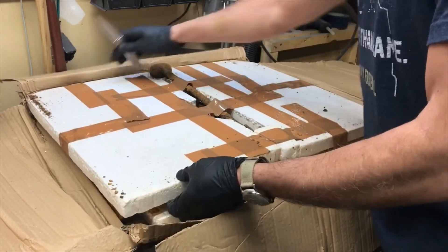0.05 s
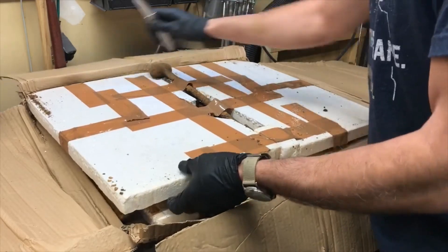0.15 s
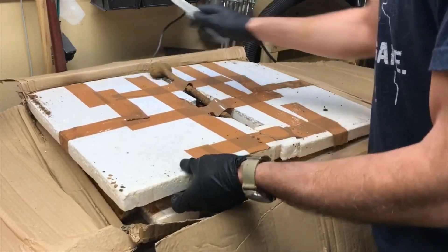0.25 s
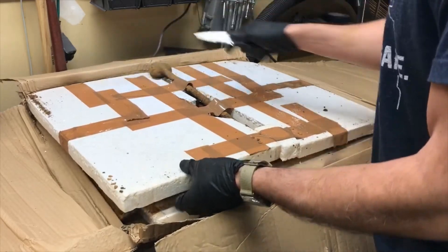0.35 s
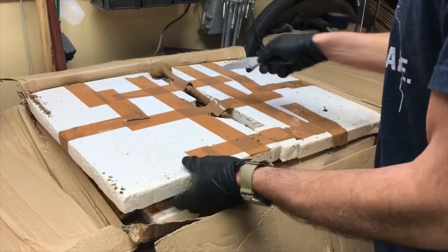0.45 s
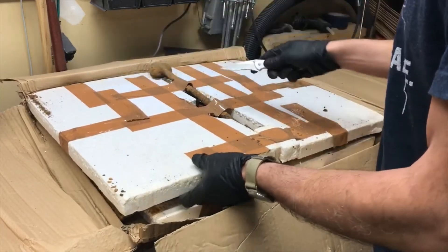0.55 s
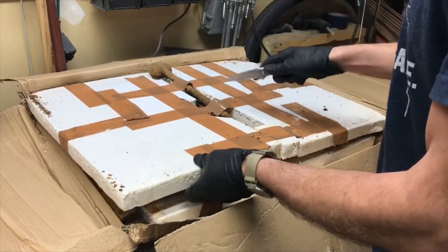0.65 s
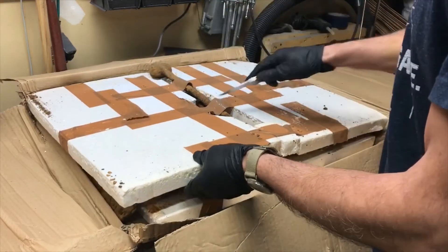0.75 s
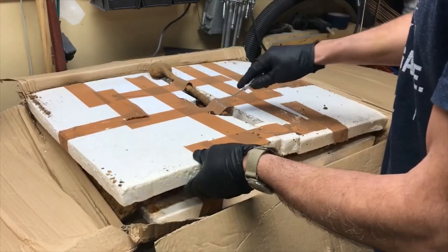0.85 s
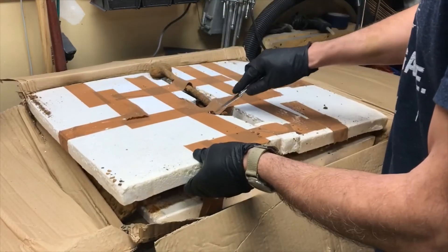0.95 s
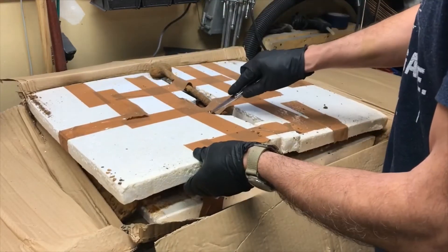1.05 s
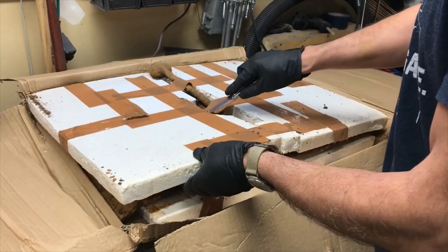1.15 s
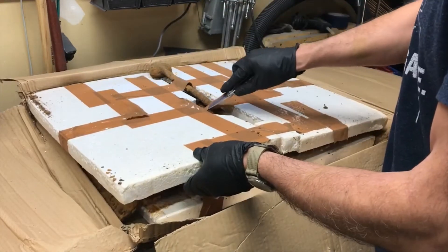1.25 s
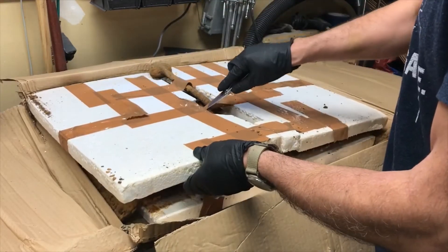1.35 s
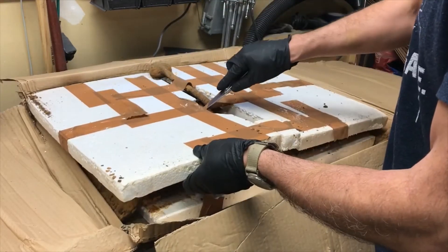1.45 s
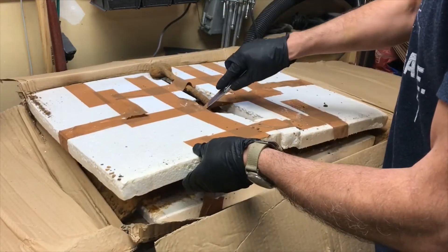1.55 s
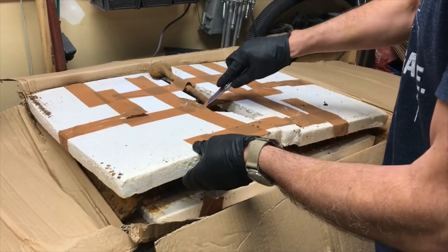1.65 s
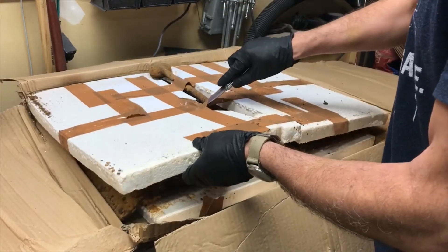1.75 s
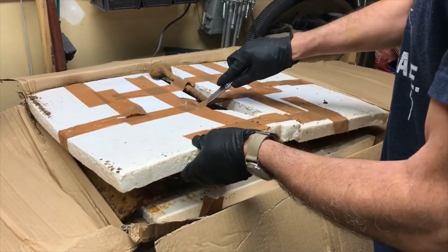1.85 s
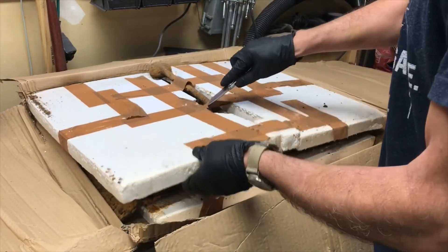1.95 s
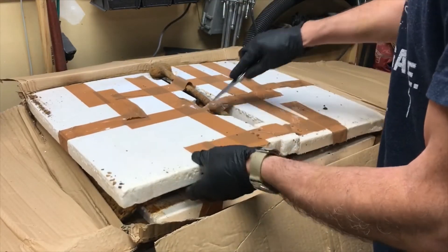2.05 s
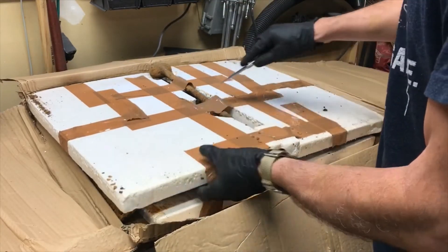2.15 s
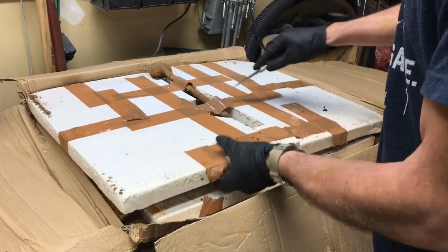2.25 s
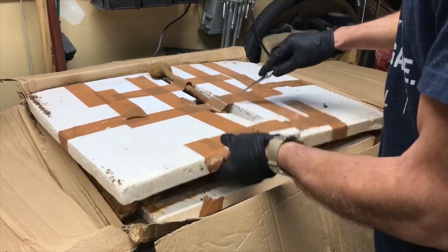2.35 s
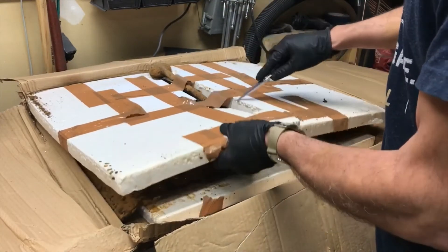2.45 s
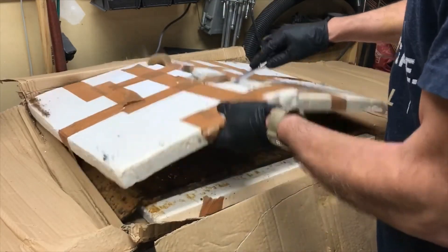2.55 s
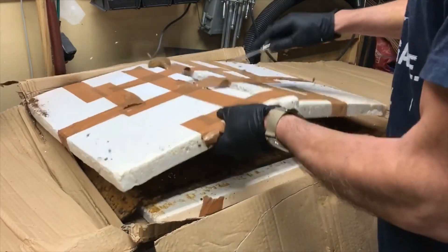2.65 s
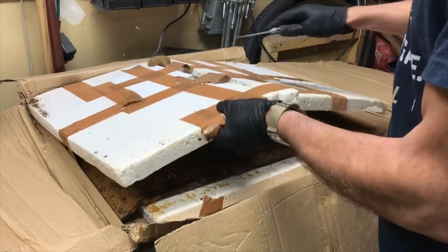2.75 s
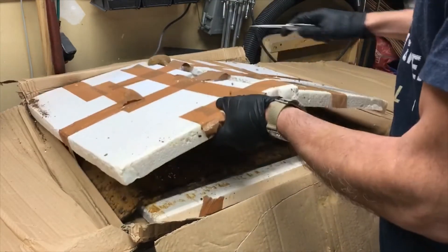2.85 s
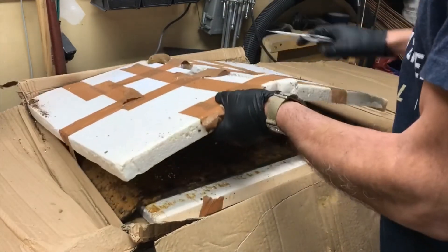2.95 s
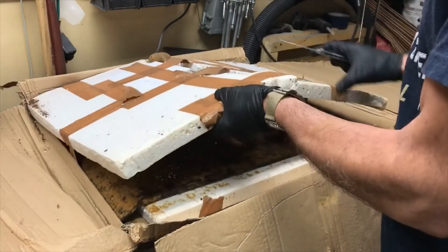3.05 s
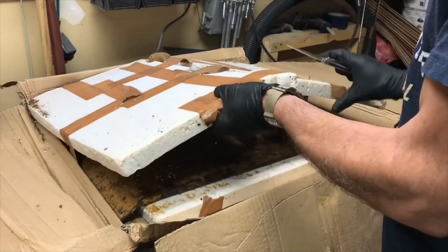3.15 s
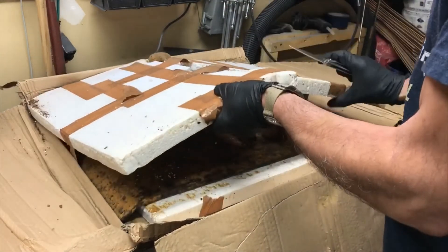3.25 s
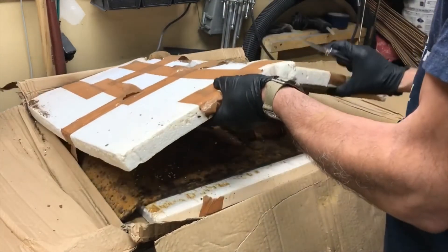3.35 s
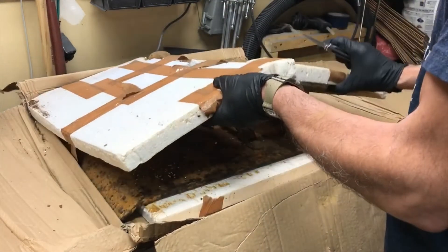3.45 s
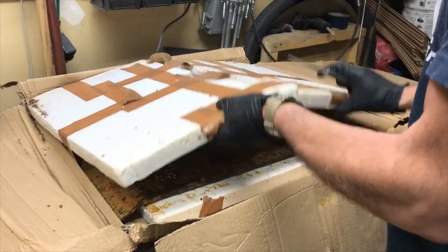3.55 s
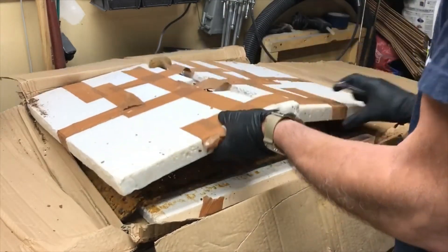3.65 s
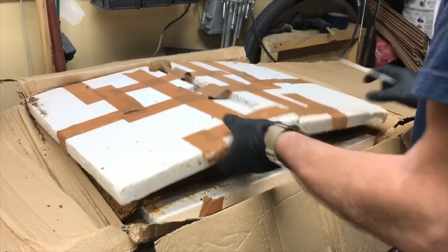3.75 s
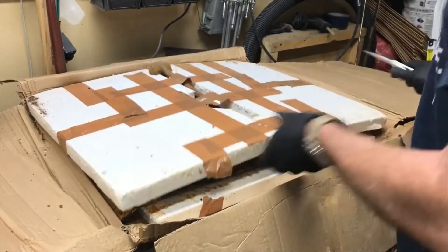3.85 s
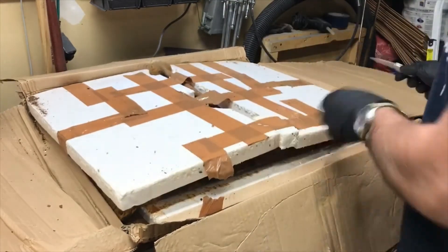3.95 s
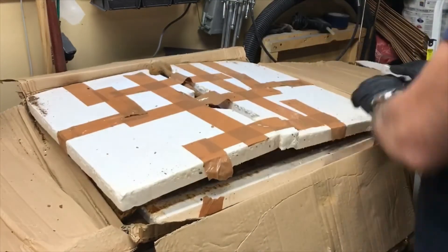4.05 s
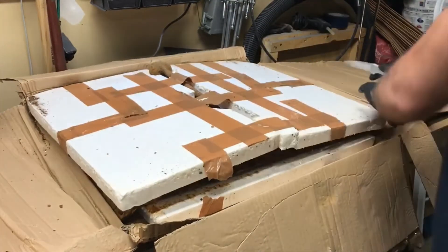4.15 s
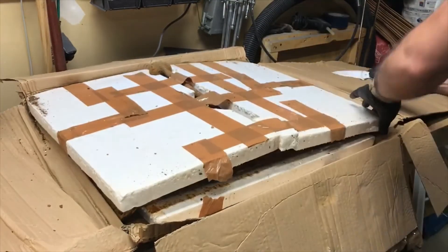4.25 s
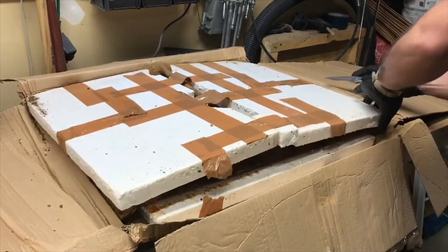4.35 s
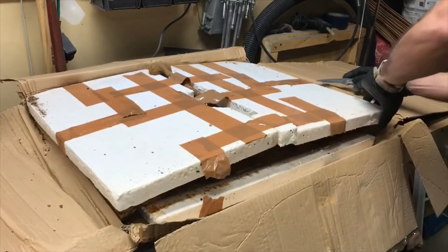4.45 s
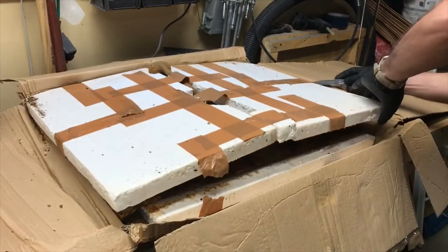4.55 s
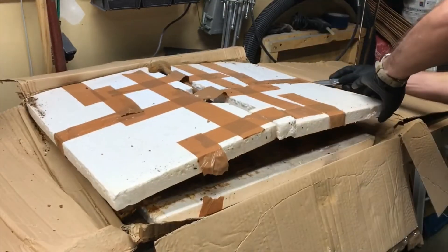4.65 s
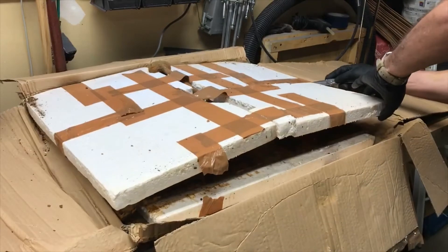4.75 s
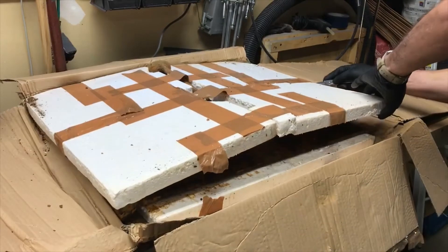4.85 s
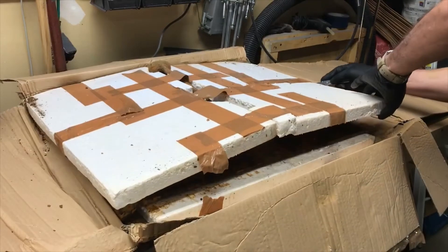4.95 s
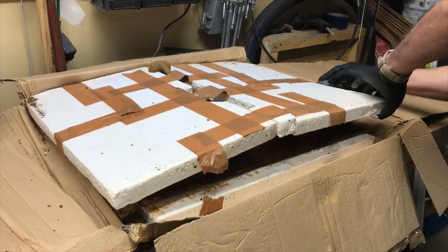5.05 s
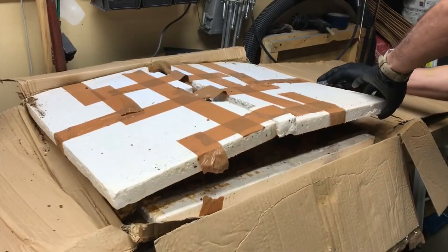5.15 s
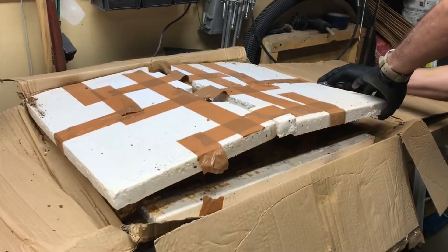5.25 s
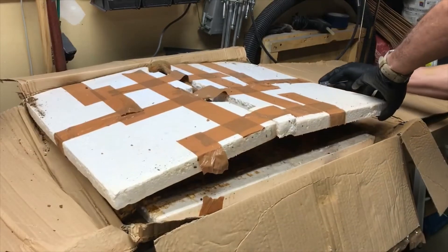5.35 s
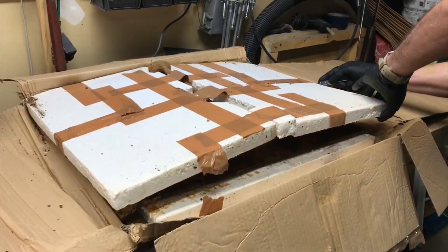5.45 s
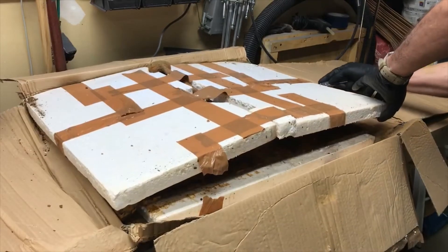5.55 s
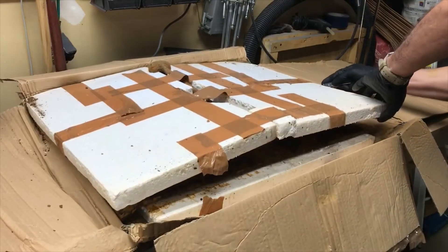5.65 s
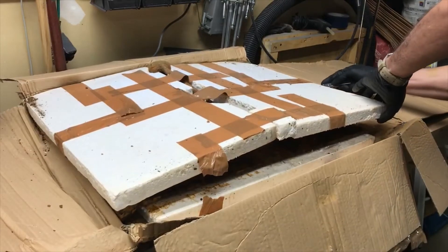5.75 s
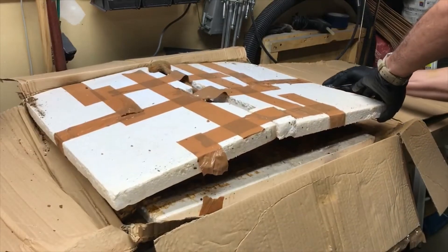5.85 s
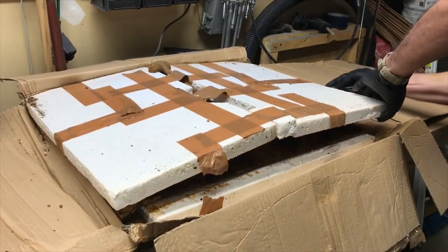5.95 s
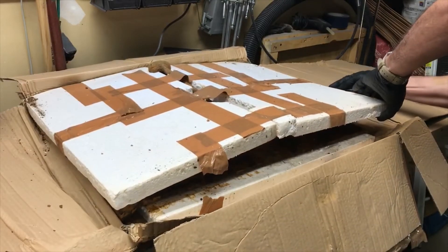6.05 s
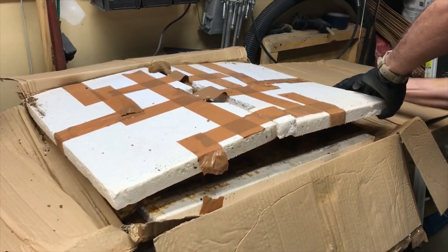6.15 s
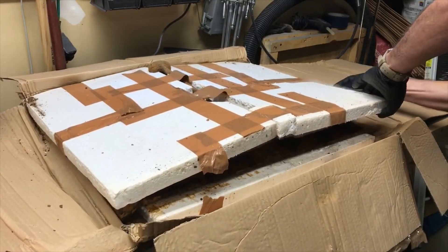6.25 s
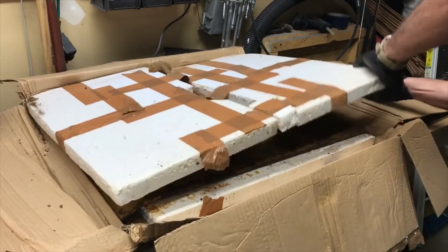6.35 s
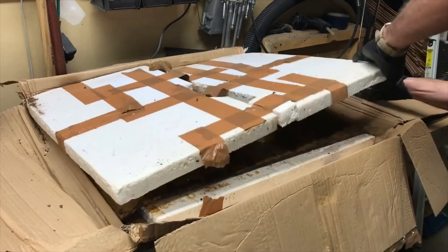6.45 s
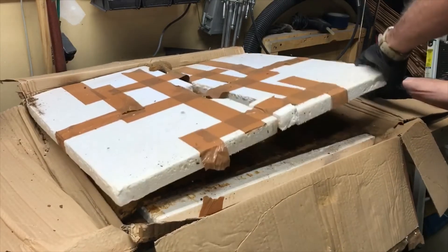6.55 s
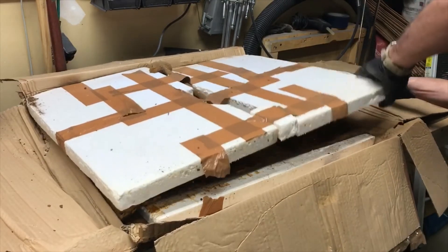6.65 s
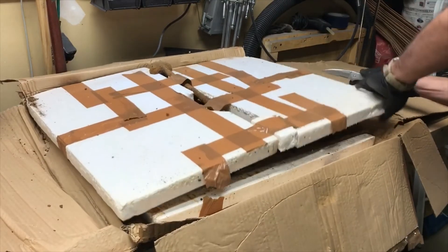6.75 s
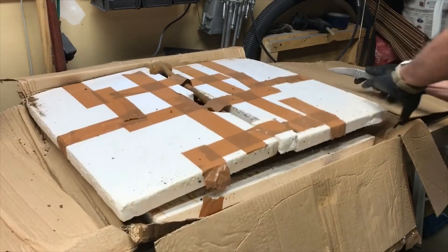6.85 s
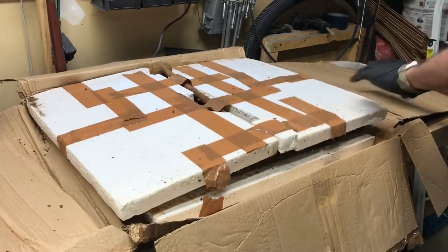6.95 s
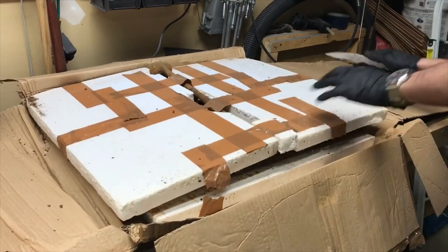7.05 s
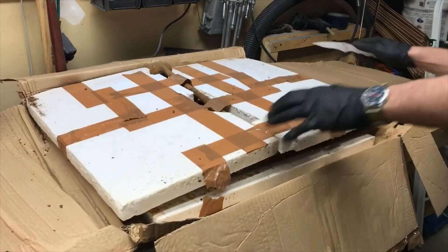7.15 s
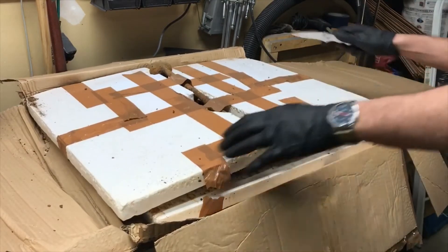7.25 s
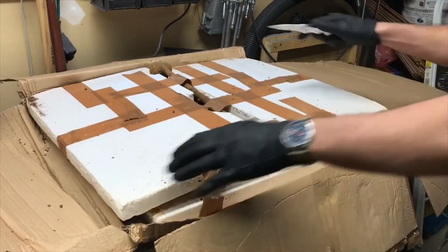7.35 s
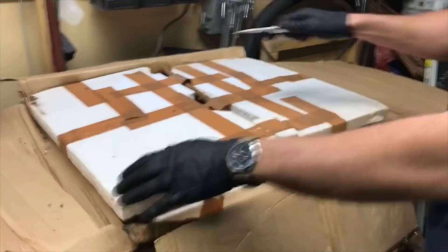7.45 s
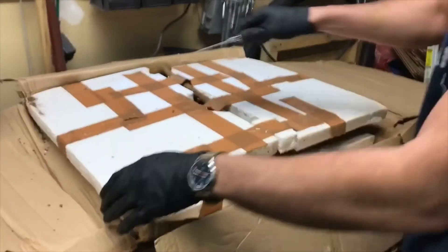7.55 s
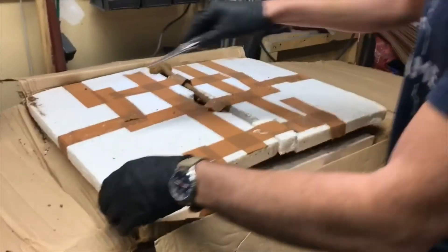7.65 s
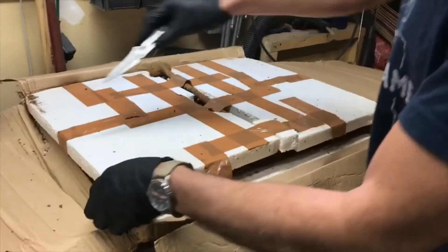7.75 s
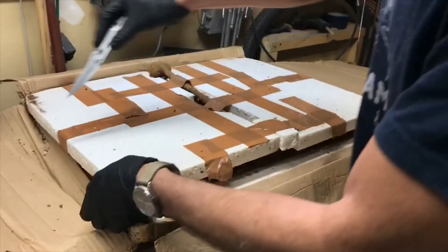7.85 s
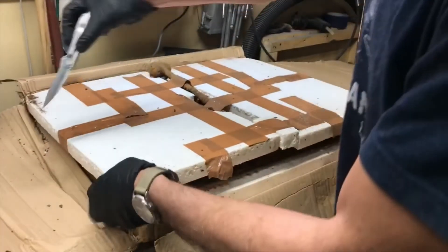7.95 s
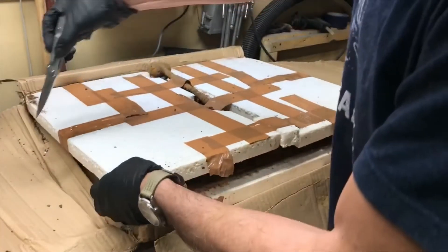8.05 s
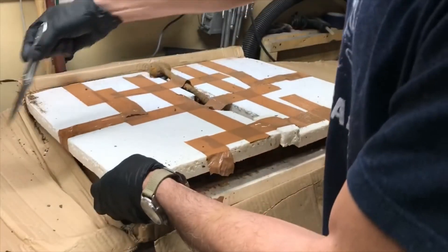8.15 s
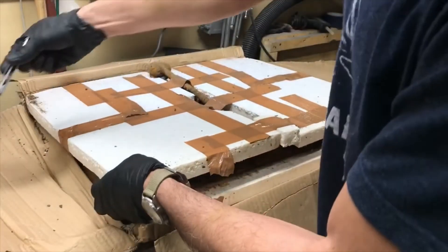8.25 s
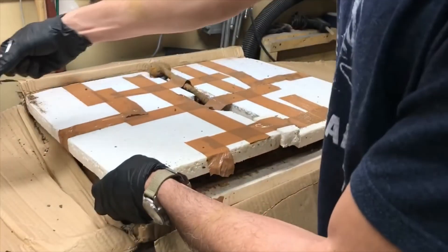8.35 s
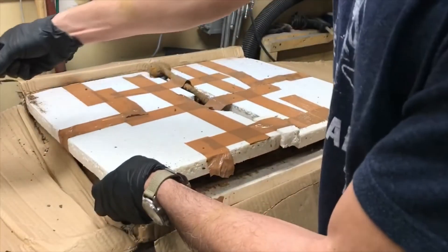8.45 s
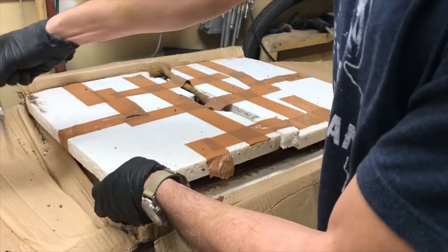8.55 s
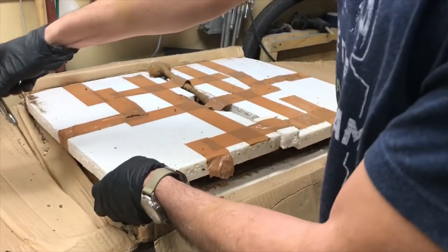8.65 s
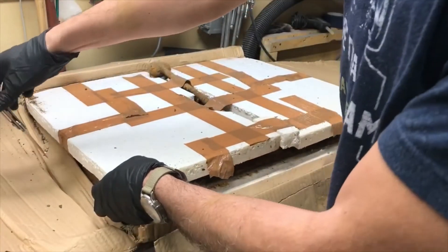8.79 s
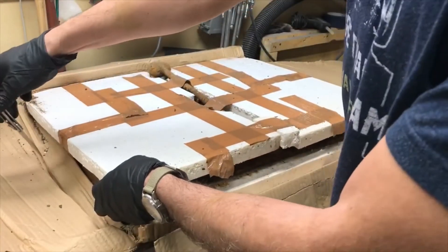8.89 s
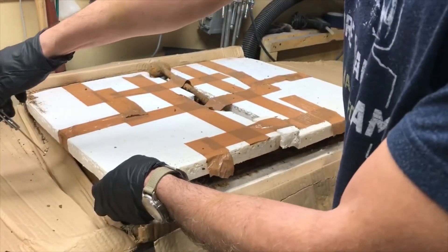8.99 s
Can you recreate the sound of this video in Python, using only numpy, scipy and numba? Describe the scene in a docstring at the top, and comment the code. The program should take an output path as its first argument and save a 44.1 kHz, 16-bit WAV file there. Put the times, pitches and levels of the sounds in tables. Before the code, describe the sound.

Tape crinkles and stiff foam creaks as gloved hands pry a slab from a cardboard box, with sharp cracks and dull thumps.

```python
"""A soft bump and a rush of rubbing and crinkling come first, over a low hum in a small workshop.
Gloved hands cut tape and prise a stiff foam slab out of a cardboard box, a metre from a phone.
Foam creaks and tape crinkles as many tiny rings; glued spots let go with cracks that ring the slab.
Bumps are bursts of low noise that ring the box, and brushes are narrow hisses.
The room adds a short tail of fading noise."""
import sys
import numpy as np
from scipy import signal
from scipy.fft import rfft, irfft
from scipy.io import wavfile
from scipy.ndimage import uniform_filter1d
from numba import njit

SR = 44100
rng = np.random.default_rng(int(sys.argv[2]) if len(sys.argv) > 2 else 0)


def attenuation_scalar(level_db):
    """Turn a level in dB into a linear amplitude multiplier (20 dB per decade)."""
    decades = np.asarray(level_db, float) / 20
    return 10 ** decades


def to_wav(s):
    """Save 16-bit WAV."""
    ch = np.atleast_2d(s).T  # columns
    pcm = np.round(np.clip(ch, -1, 1) * 32767)  # PCM
    wavfile.write(sys.argv[1], SR, pcm.astype(np.int16))


N = 397782  # length in samples, about 9 s


def level(x, db):
    """Scale a sound to an rms level in dB."""
    return x * attenuation_scalar(db) / np.sqrt(np.mean(x ** 2))


def colour(x, points):
    """Filter through (f/Hz, level/dB) points without any sound ahead of time, from the folded cepstrum."""
    hz, db = np.transpose(points)
    size = 4096
    log_hz = np.log(np.fft.rfftfreq(size, 1 / SR) + 1)
    gain = np.interp(log_hz, np.log(hz), db) * np.log(10) / 20
    cepstrum = irfft(gain)
    cepstrum[1:size // 2] *= 2
    cepstrum[size // 2 + 1:] = 0
    response = irfft(np.exp(rfft(cepstrum)))
    return signal.fftconvolve(x, response)[:len(x)]


@njit
def rings(start, hz, cycles, size):
    """Fading rings, each dying by 1/e in its number of cycles."""
    out = np.zeros(N)
    for k in range(len(start)):
        turn = np.exp((2j * np.pi - 1 / cycles[k]) * hz[k] / SR)
        z = size[k] + 0j
        end = min(N, start[k] + int(6 * cycles[k] * SR / hz[k]))
        for i in range(start[k], end):
            z *= turn
            out[i] += z.imag
    return out


def modes(x, table):
    """A solid body answers with fading tones, listed as (f/Hz, level/dB, t60/s)."""
    t = np.arange(SR // 2) / SR
    ring = sum(attenuation_scalar(db) * np.sin(2 * np.pi * hz * t) * 1000. ** (-t / t60) for hz, db, t60 in table)
    return signal.fftconvolve(x, ring / np.abs(ring).max())[:N]


def walk(rate):
    """Random levels held 1 / rate seconds, with sloping steps; spread near 1."""
    k = int(SR / rate)
    held = np.repeat(rng.standard_normal(N // k + 1), k)
    return uniform_filter1d(held, k // 2)[:N]


def grains(count, low_hz, high_hz, cycles, spread_db, most_db):
    """Tiny slips at random moments, mostly small, a few larger, each with its own pitch."""
    u = rng.random((count, 4))
    hz = low_hz * (high_hz / low_hz) ** u[:, 1]
    size_db = np.minimum(-spread_db * np.log(1 - u[:, 2]), most_db)
    size = attenuation_scalar(size_db) * np.sign(u[:, 3] - .5) * hz / low_hz
    return rings((u[:, 0] * N).astype(np.int64), hz, np.full(count, cycles), size)


def rustle(db, points, slips, hiss_db, surge_db):
    """Slips over finer, denser ones (white noise), in quick uneven surges."""
    white = level(slips, 0) + attenuation_scalar(hiss_db) * rng.standard_normal(N)
    return level(colour(white, points) * attenuation_scalar(surge_db), 0) * attenuation_scalar(db)


def swells(start, rise, hold, fade, db, rest_db):
    """Level in dB of movements that rise, hold and fade (seconds per 20 dB); their powers add."""
    step = .002  # s, also the shortest fade
    t = np.arange(0, N / SR + step, step)[:, None]
    rising = np.maximum(start - t, 0) / rise
    fading = np.maximum(t - start - np.abs(hold), 0) / np.maximum(fade, step)
    movement_db = db - 20 * np.minimum(rising + fading, 10)
    power = attenuation_scalar(2 * rest_db) + attenuation_scalar(2 * movement_db).sum(axis=1)
    return np.interp(np.arange(N) / SR, t[:, 0], 10 * np.log10(power))


# hands rubbing, dragging and bending the slab:
# (t/s, hold/s, fade/s per 20 dB, foam on card level/dB, tape and glove crinkle level/dB)
# a fade of zero or less is a near-instant stop
STROKES = [(0, 0.002, 0.08, -53, -47), (0.093, 0.048, 0.63, -58, -59), (0.189, 0.062, 0.14, -51, -50),
           (0.375, 0.012, 0.24, -63, -58), (0.475, 0.15, 0.12, -53.5, -50),
           (0.698, 0.055, 0.2, -60.5, -62.5), (0.873, 0, 0.26, -64.5, -61), (1.098, 0.014, 0.1, -62, -59.5),
           (1.211, 0.022, 0, -54, -55), (1.245, 0.051, 0.05, -49.5, -47.5), (1.367, 0.096, 0, -66.5, -62.5),
           (1.492, 0.029, -0.1, -67, -60), (1.542, 0.018, 0.3, -61, -57),
           (1.596, 0.046, 0.11, -46.5, -48.5), (1.733, 0, 0.15, -48.5, -54), (1.76, 0.013, 0.4, -61, -55),
           (1.949, 0.038, 0.64, -52.5, -51), (2.08, 0, 0.14, -49, -48.5), (2.148, 0.1, 0.21, -46, -40),
           (2.336, 0.081, 0.55, -51.5, -52.5), (2.49, 0.11, 1.05, -47, -45.5),
           (2.522, 0.017, 0.07, -26.5, -26), (2.65, 0, 0.15, -41, -42), (2.747, 0.028, 0.27, -42.5, -40),
           (2.917, 0.11, 0.33, -44, -45), (3.174, .025, 0.4, -50, -48), (3.293, 0.1, 0.3, -46, -46.5),
           (3.505, 0.043, -0.15, -49.5, -49), (3.558, 0.057, 0.1, -43, -40.5),
           (3.719, 0.082, 0.07, -49, -47), (3.761, 0.035, 0.22, -41, -41), (3.98, .08, .1, -64, -71),
           (4.143, 0.016, 0, -48, -57), (4.19, 0, .05, -56, -66), (4.243, 0.024, .075, -42.5, -43.5),
           (4.348, 0.22, 0.11, -48.5, -49), (4.67, 0.033, 0.04, -57, -78),
           (4.865, 0.0044, -0.07, -59.5, -77), (5.121, .075, -0.06, -57.5, -63),
           (5.31, 0.043, -0.6, -62, -66), (5.341, 0, 0.2, -52.5, -67), (5.519, 0.0034, 0.28, -56, -52.5),
           (5.591, 0.043, 0, -56, -58), (5.87, 0.042, -0.5, -59.5, -61), (5.927, 0.028, .15, -50, -60),
           (6.075, 0.016, .04, -54, -74.5), (6.328, 0.05, 0.2755, -40, -43.5), (6.5, 0.14, 0.3, -53, -50),
           (6.69, 0.029, 0.23, -47, -49), (6.776, 0.011, 0.1346, -42.5, -41.5),
           (7.087, 0.0058, 0.7, -72, -67), (7.024, 0, 0.18, -63.5, -65), (7.335, 0.0012, 0.15, -62, -77),
           (7.592, 0.035, 0.23, -63.5, -55), (7.664, 0.011, 0.12, -42, -44.5),
           (7.74, 0.033, 0.09, -53, -47.5), (7.854, 0.027, .1, -57, -59), (7.931, 0, 0.0552, -53, -39.5),
           (8, 0.022, 0.07, -47.5, -45.5), (8.1, 0.00066, 0.22, -59.5, -63),
           (8.52, 0.064, -0.3, -71.5, -66), (8.702, .02, -0.15, -75, -65), (8.903, 0.047, .05, -77.5, -66)]


def movement():
    """Rubbing and crinkling levels in dB: the strokes of the hands and the settling after each crack."""
    s, hold, fade, rub_db, crinkle_db = np.transpose(STROKES)
    at, db, _, snap_db = np.transpose(CRACKS)
    rise_s, settle_rise_s = .022, .004  # s per 20 dB
    rest_rub_db, rest_crinkle_db = -76, -73.5  # hands resting on the slab
    # weaker cracks leave a quieter and shorter settling of foam and tape
    settle_rub_db = -25 + 0.86 * db
    settle_crinkle_db = -38.5 + .55 * (db + snap_db)
    settle_fade = 0.12 * attenuation_scalar(0.33 * db)
    start = np.r_[s, at + settle_rise_s]
    rise = np.r_[rise_s + 0 * s, settle_rise_s + 0 * at]
    shape = (start, rise, np.r_[hold, 0 * at], np.r_[fade, settle_fade])
    rub = swells(*shape, np.r_[rub_db, settle_rub_db], rest_rub_db)
    crinkle = swells(*shape, np.r_[crinkle_db, settle_crinkle_db], rest_crinkle_db)
    return rub, crinkle


# tones of the foam slab: (f/Hz, relative level/dB, t60/s)
SLAB_TONES = [(600, -9, 0.077), (854, -5, 0.083), (1120, -13, 0.14), (1120, -1.5, .22), (1160, -6.5, .2),
              (1357, -2.5, 0.15), (1610, -1.5, .1), (1730, -2.5, 0.12), (2200, -8, .08), (2690, -8, .08),
              (3300, -11, .06)]


def slab(x):
    """The stiff slab rings in its own tones when shaken."""
    return modes(x, SLAB_TONES)


# tones of the cardboard box: (f/Hz, relative level/dB, t60/s)
BOX_TONES = [(66, -19.5, .12), (96, -6, 0.15), (128, -6.5, 0.051), (179, -1, 0.11), (220, 2.5, 0.048),
             (274, -1, 0.024), (382, -4, 0.029)]


def box(x):
    """The box walls boom in their own low tones when pushed."""
    return modes(x, BOX_TONES)


# tone balance of foam rubbing on card: (f/Hz, relative level/dB per Hz)
RUB = [(150, -26), (300, -9.5), (450, -7.5), (600, -6), (1100, -4), (1800, -5), (3000, -6.5), (5000, -16.5),
       (9000, -40)]
# tone balance of crinkling tape: (f/Hz, relative level/dB per Hz)
CRINKLE = [(1500, -26), (2800, -12.5), (4400, -2.5), (5000, -6), (6500, -1.5), (7900, -6.5), (8700, -1.5),
           (10500, -7.5), (12000, -3.5), (15000, -7.5)]


def handling():
    """One hand movement makes foam creak in the middle range and tape crinkle in the treble."""
    rub_db, crinkle_db = movement()
    creaks = grains(count=16000, low_hz=495.0, high_hz=4920.0, cycles=1.3, spread_db=2.0, most_db=13)
    ticks = grains(count=25000, low_hz=2500., high_hz=16000.0, cycles=0.97, spread_db=2.5, most_db=16.0)
    surge = walk(70)  # shared by foam and tape
    rub = rustle(rub_db, RUB, creaks, -0.5, 2.5 * surge + 0.96 * walk(60))
    crinkle = rustle(crinkle_db, CRINKLE, ticks, -1.3, 1.6 * surge + 2.5 * walk(60))
    # the contact patch changes, so the creak wanders between dull and bright
    dull = signal.sosfilt(signal.butter(2, 1300., fs=SR, output="sos"), rub)
    lean_db = 2.43 * walk(18)
    rub = dull * attenuation_scalar(-lean_db) + (rub - dull) * attenuation_scalar(lean_db)
    # the rubbing also sets the slab and the box walls ringing
    return rub + attenuation_scalar(-49) * slab(rub) + attenuation_scalar(-30) * box(rub) + crinkle


# slab and box bumping: (t/s, push level/dB before the box rings, hardness of contact as top f/Hz)
THUDS = [(0.0, -40, 298), (1.247, -42.5, 520), (1.64, -48, 520), (2.04, -44.5, 380), (2.52, -23.5, 600),
         (2.54, -23.5, 380), (2.568, -25.5, 298), (2.987, -36.5, 300), (3.352, -34, 380), (3.4, -30.5, 380),
         (3.839, -41.5, 218), (6.116, -34.5, 380), (6.276, -21, 380), (7.387, -31.5, 301),
         (7.408, -31, 200), (7.5, -43.5, 200)]


def thuds():
    """Uneven pushes that swell and die away, duller the softer the contact, ring the box."""
    push = np.zeros(N + SR)
    t = np.arange(SR // 5) / SR
    swell = (1 - np.exp(-t / 0.0096)) * np.exp(-1000 * t / 27.3)  # grows over 9.6 ms, dies over 27.3 ms
    for s, db, hz in THUDS:
        shove = rng.standard_normal(len(t)) * swell
        shove = signal.sosfilt(signal.butter(2, (65., hz), "bandpass", fs=SR, output="sos"), shove)
        size = np.sqrt(np.sum(shove ** 2) * 0.35 * SR / hz)
        first = int(s * SR)
        push[first:first + len(t)] += attenuation_scalar(db) * shove / size
    return box(push[:N])


# tone balance of rumble and hiss: (f/Hz, relative level/dB per Hz)
HUM = [(15, -35), (25, -1.5), (76, 5.5), (130, -2), (344, -9), (451, -12.5), (1070, -14.5), (3250, -24),
       (3620, -43), (5730, -26), (7710, -40), (12200, -35.5), (16000, -37)]


def hum():
    """Workshop rumble and microphone hiss: coloured noise whose level drifts slowly."""
    noise = colour(rng.standard_normal(N), HUM)
    return level(noise * attenuation_scalar(1.0 * walk(4.0)), -63.5)


# the room's fading: (f/Hz, t60/s, level/dB)
ROOM = [(152, 0.56, -11), (505, .42, -1.5), (800, .45, -6), (1130, 0.51, -2.5), (1620, .42, -8),
        (3600, 0.46, -8), (9200, 0.15, -11)]


def room(x):
    """Dense reflections build up over a few ms, then fade at a different pace in each band."""
    t = np.arange(SR) / SR
    hz = [row[0] for row in ROOM]
    noise = rfft(rng.standard_normal(SR))
    # position of each frequency among the table's rows, so that neighbouring bands blend
    place = np.interp(np.log(np.arange(len(noise)) + 1), np.log(hz), np.arange(len(hz)))
    tail = 0
    for k, (_, t60, db) in enumerate(ROOM):
        band = irfft(noise * np.maximum(1 - np.abs(place - k), 0))
        fading = band * 1000. ** (-t / t60)
        tail = tail + attenuation_scalar(db) * fading / np.sqrt(t60 * SR / 2 / np.log(1000))
    build_up = 1 - np.exp(-(t / 0.0039) ** 2)
    return signal.fftconvolve(x, tail * build_up)[:N]


def strays(count):
    """Small cracks at random moments, stronger where the handling around them is stronger."""
    rub_db, crinkle_db = movement()
    u = rng.random((count, 3))
    at = (u[:, 0] * (N - SR // 10)).astype(int)
    db = rub_db[at] + 7 + 9 * u[:, 1] ** 2  # 7 to 16 dB over the rubbing
    return np.c_[at / SR, db, 1000 * 4 ** u[:, 2], crinkle_db[at] - rub_db[at]]


def splinter(s, db, hz, ms, count, fade_db, octaves, cycles):
    """Each break is one sharp slip followed by weaker ones, mostly higher in pitch."""
    u = rng.random((len(s), 3, count))
    later = np.arange(count) > 0
    late = u[:, 0] ** 1.5 * later
    size = attenuation_scalar(db[:, None] - fade_db * late - 2.2 * later) * np.sign(u[:, 1] - .5)
    pitch = hz[:, None] * 2 ** (octaves * (u[:, 2] - .3) * later)
    pitch = np.minimum(pitch, .4 * SR)
    start = ((s[:, None] + late * np.abs(ms[:, None]) / 1000) * SR).astype(np.int64)
    return rings(start.ravel(), pitch.ravel(), np.full(start.size, cycles), size.ravel())


# glue and tape letting go:
# (t/s, knock level/dB before filtering, knock f/Hz, bright snap level/dB over the knock)
CRACKS = [(.088, -39.5, 1970, -1), (.645, -37.5, 2150, 8), (.859, -49, 3140, 11), (.876, -53, 3000, 8),
          (.912, -50, 3550, 8), (.939, -45.5, 1310, -10), (1.027, -49.5, 2500, 13), (1.1, -49, 1450, 10),
          (1.118, -50, 1500, 3), (1.14, -46, 1770, 4), (1.149, -46, 2130, 0), (1.197, -38.5, 2670, -11),
          (1.214, -32, 2500, -2), (1.253, -26.5, 2090, .5), (1.298, -31.5, 3020, 0),
          (1.438, -51.5, 3920, 17.5), (1.502, -50, 2630, 1), (1.62, -23, 2500, -5.5),
          (1.649, -33, 1420, -18), (1.723, -37, 2450, 4), (1.797, -36, 2550, 9.5), (1.966, -34, 1330, 8.5),
          (2.012, -38.5, 1380, 11), (2.072, -36.5, 1540, 7), (2.412, -35.5, 1640, 5.5),
          (2.509, -25.5, 992, 3.5), (2.52, -20.5, 2185, 6.5), (2.528, -15, 2260, 3.5),
          (2.542, -16, 3600, 2), (2.763, -36, 1020, -5), (2.834, -29, 2130, 4), (2.847, -25, 3950, -6),
          (2.929, -22.5, 1720, -1), (2.972, -29.5, 1630, 1), (3.025, -38, 1410, 7),
          (3.047, -33.5, 3860, 10), (3.084, -33, 1620, -8), (3.203, -35.5, 2740, -3),
          (3.244, -23, 1340, 2.5), (3.256, -22.5, 765, -12), (3.352, -23.5, 1050, -4),
          (3.378, -16, 1240, -1.5), (3.392, -26, 1320, 4), (3.403, -12, 1340, -0.5),
          (3.519, -38.5, 1120, 11.5), (3.706, -25.5, 2370, -19), (3.734, -33, 920, -2),
          (3.759, -31.5, 1160, 4), (3.865, -36, 1240, 1), (3.882, -29, 1190, 1), (4.032, -43.5, 1520, 5),
          (4.043, -40, 1330, -2), (4.07, -51.5, 1490, 14), (4.124, -51, 2600, 12), (4.139, -28.5, 1970, -6),
          (4.197, -31, 1550, -6.5), (4.214, -40, 1190, 5), (4.363, -38, 1030, -2), (4.404, -30.5, 2480, -4),
          (4.469, -36, 1590, 11), (4.526, -37.5, 1080, 8.5), (4.679, -40, 1050, 2.5),
          (4.775, -55.5, 1310, 12), (4.808, -46.5, 2300, 14.5), (4.859, -33, 800, 1),
          (5.226, -50, 2710, 13), (5.244, -34, 3160, .5), (5.262, -32, 3980, 0), (5.404, -44, 2690, -16),
          (5.482, -35, 1450, 0), (5.546, -38, 2800, 5.5), (5.631, -36, 4010, 5.5), (5.643, -34.5, 2500, 0),
          (5.735, -27.5, 3200, -1.5), (5.94, -30, 2423, -2), (6.076, -36.5, 1880, -39.5),
          (6.118, -3.5, 1410, -4.5), (6.121, -7.5, 2200, 0.5), (6.125, -15.5, 774, -20),
          (6.279, -5, 1076, 7), (6.284, -15, 1120, -15), (6.445, -30.5, 1080, 3.5), (6.533, -35, 1160, -14),
          (6.593, -27.5, 3030, -4), (6.613, -31.5, 1660, -4), (6.645, -33.5, 2550, 5.5),
          (6.677, -31, 1380, -2), (6.686, -34, 3350, 9), (6.736, -29.5, 1600, -12), (6.859, -32, 1520, 2.5),
          (6.954, -39, 3980, 11.5), (6.964, -37, 2110, 3), (7.13, -48, 3260, -5), (7.144, -50, 722, 15.5),
          (7.23, -44.5, 2120, -4), (7.304, -53, 1250, 2), (7.332, -37, 1120, -5), (7.386, -45, 2350, 15),
          (7.635, -42, 1660, -5), (7.677, -22, 3080, -6), (7.768, -29.5, 2120, -9),
          (8.018, -27.5, 1420, -2), (8.041, -25, 1560, -14), (8.09, -31, 1400, 3), (8.293, -53, 1020, 16.5),
          (8.304, -46, 2200, -6)]
# a small break sends out no bass: (f/Hz, level/dB)
FOAM_EDGE = [(100, -38.5), (400, -7), (700, -4.5), (2000, 0), (5000, 1), (16000, 2)]


def cracks():
    """A knock that rings the slab and a bright snap of the tape film; big breaks last longer."""
    s, db, hz, snap_db = np.r_[CRACKS, strays(count=260)].T
    # knocks under 1700 Hz drive the slab harder, by 14 dB per octave
    drive_db = -42 + 14 * np.maximum(np.log2(1700 / hz), 0)
    ms = 4.5 * attenuation_scalar(.08 * db)
    snap_hz = np.full(len(s), 6000.)
    knock = splinter(s, db, hz, ms, count=7, fade_db=9, octaves=2.01, cycles=1.94)
    snap = splinter(s, db + snap_db, snap_hz, ms, count=10, fade_db=9.5, octaves=1.8, cycles=1.41)
    shake = splinter(s, db + drive_db, hz, ms, count=3, fade_db=4, octaves=0.6, cycles=0.78)
    return colour(knock + slab(shake) + snap, FOAM_EDGE)


# short high hisses, perhaps the blade on tape: (t/s, level/dB, fade/s per 20 dB)
# a fade of zero or less is a near-instant stop
BRUSHES = [(4.828, -56, -0.37), (7.143, -45.5, 0.06), (7.388, -52.5, .08), (7.478, -58, 0.1),
           (7.569, -58, 0)]
# their tone balance: (f/Hz, relative level/dB per Hz)
BRUSH = [(2500, -30), (4500, -7), (6300, 0), (8000, -5), (12000, -25)]


def brushes():
    """Sudden hisses in a narrow high band: filtered noise that rises fast, then fades or stops."""
    s, db, fade = np.transpose(BRUSHES)
    hiss = level(colour(rng.standard_normal(N), BRUSH), 0)
    return hiss * attenuation_scalar(swells(s, rise=.004, hold=0, fade=fade, db=db, rest_db=-93.5))


def scene():
    """Everything at the box, its echo and the hum."""
    near = handling() + cracks() + brushes() + thuds()
    return (near + room(near) + hum())[None]


# how the phone's microphone hears: (f/Hz, level/dB)
MIC = [(10, -29), (45, 5), (15600, 0), (16200, -28.5), (20000, -59)]


def microphone(x):
    """The phone rounds off the loudest cracks and drops the deepest bass and the top."""
    rounded = np.tanh(1.101 * x) / 1.203
    return colour(rounded, MIC)


def top_cut(x):
    """Nothing passes above the cut-off."""
    return signal.sosfilt(signal.butter(12, 16950, fs=SR, output="sos"), x)


def record(dry):
    """The scene as the phone takes it down."""
    mix = microphone(dry[0])[None]
    return top_cut(mix)


dry = scene()
out = record(dry)
to_wav(out)
```